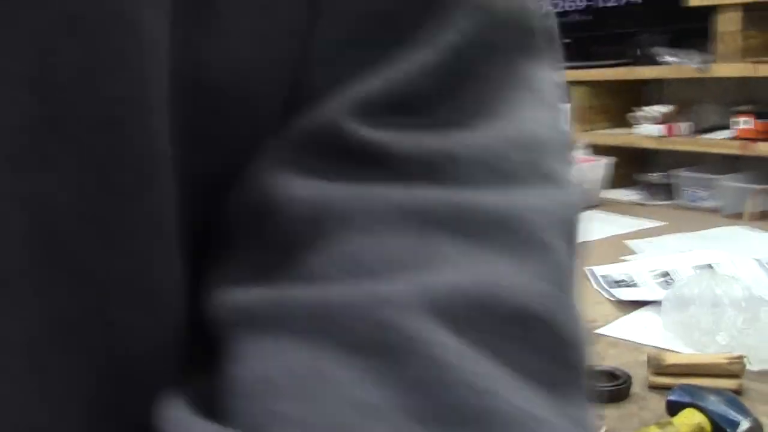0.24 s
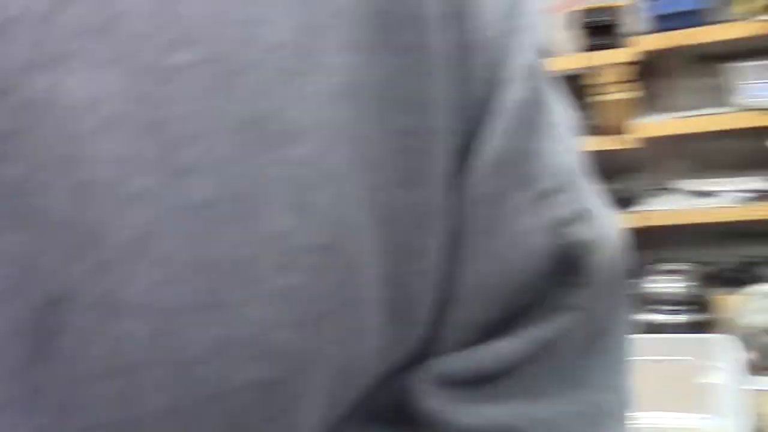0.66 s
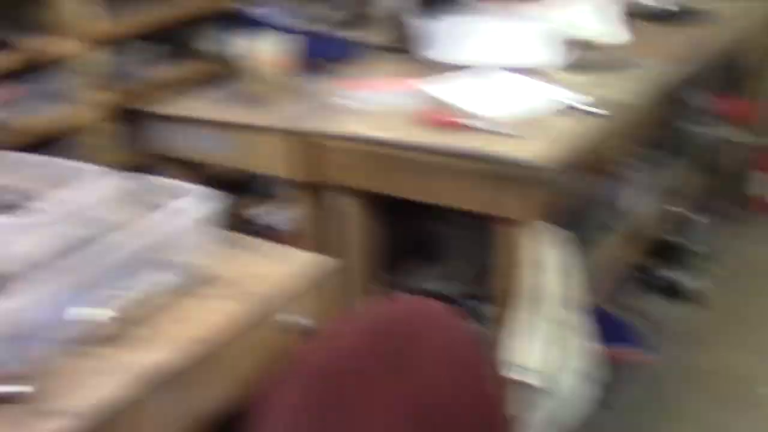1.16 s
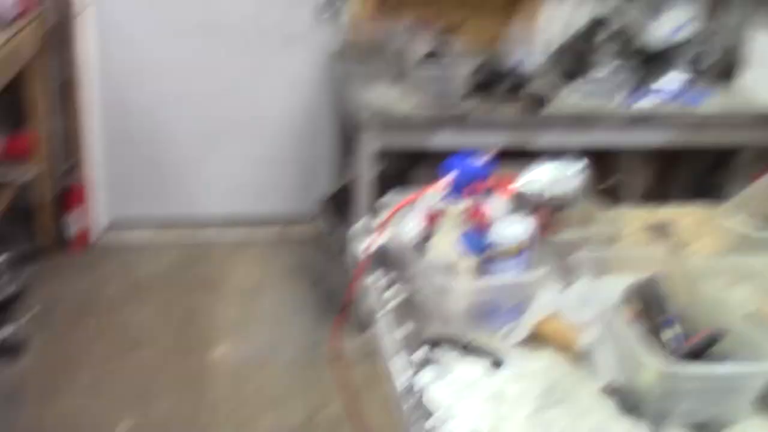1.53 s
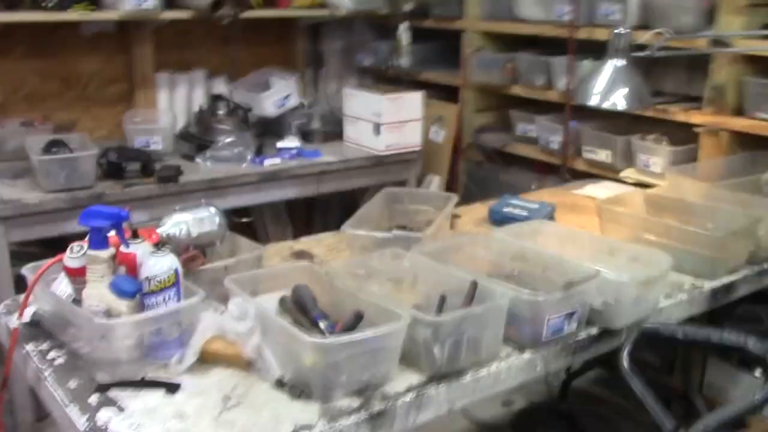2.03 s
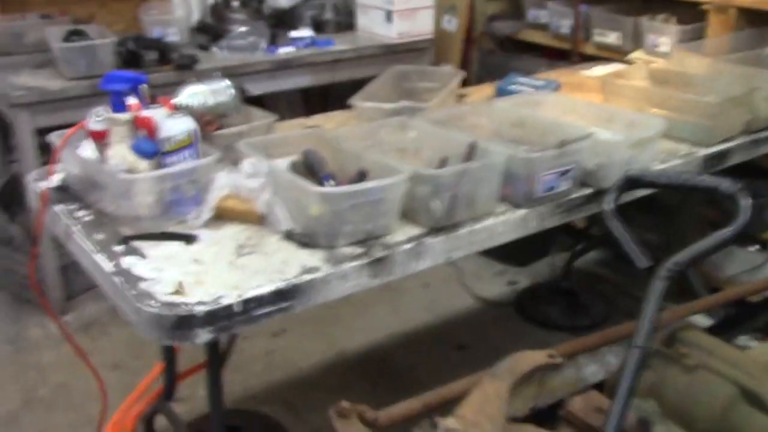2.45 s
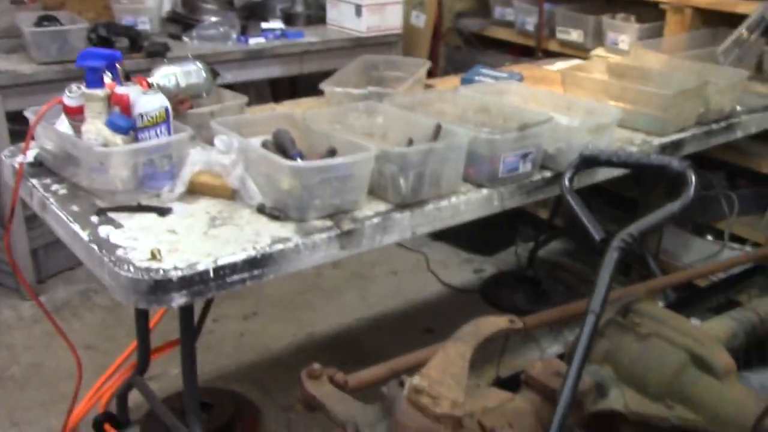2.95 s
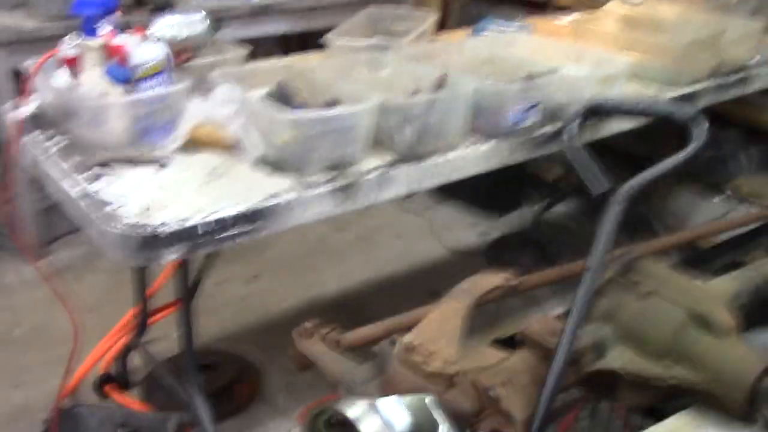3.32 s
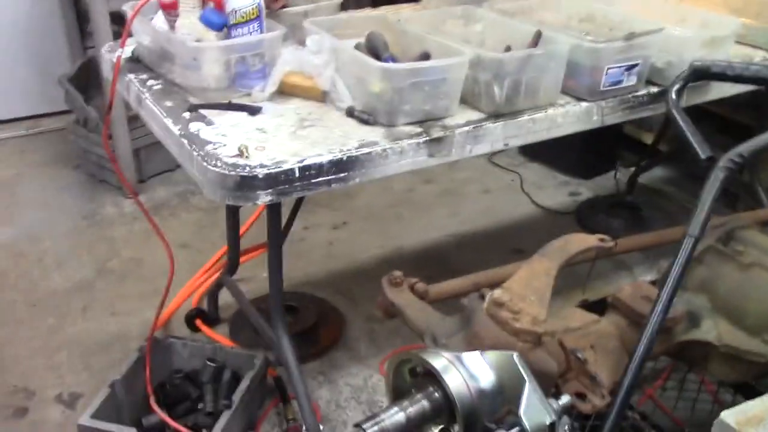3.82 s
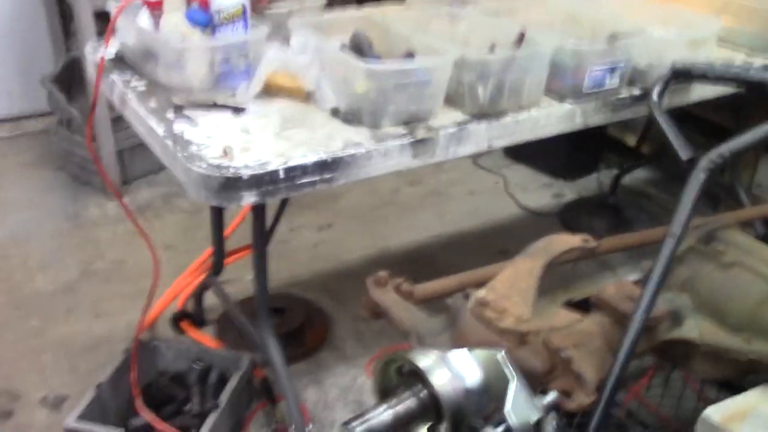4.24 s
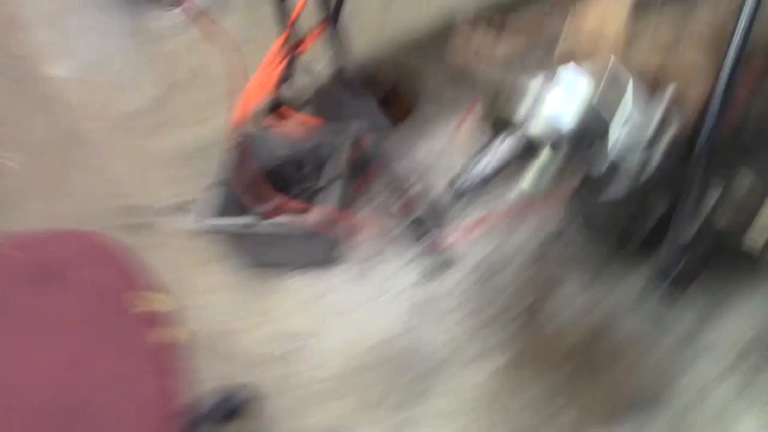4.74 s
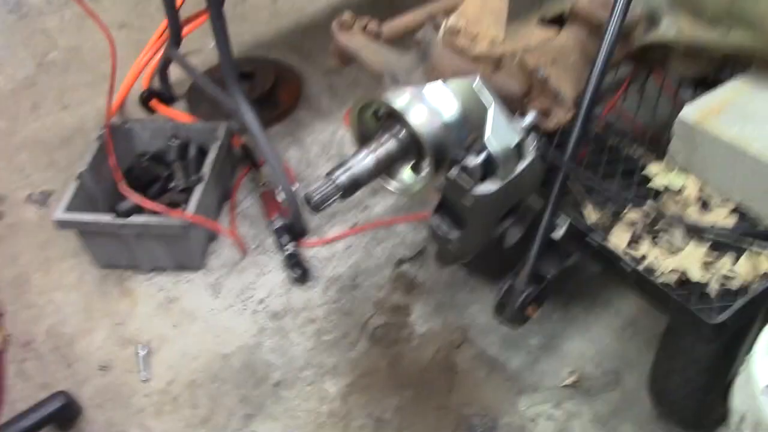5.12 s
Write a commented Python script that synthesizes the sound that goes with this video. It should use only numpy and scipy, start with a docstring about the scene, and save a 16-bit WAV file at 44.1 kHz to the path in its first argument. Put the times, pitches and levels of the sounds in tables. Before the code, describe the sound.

Close handling bumps come in rattling clusters from a carried tripod, over shoe scuffs, rubbing cloth and a low rumble.

```python
"""Clusters of knocks, soft at first and louder later, over a low rumble and scuffing: a camera on its
tripod is carried across a workshop and set down. The frame rumbles in the hand over quiet room tone.
Shoes on concrete and a sleeve on the grip make gritty noise. The legs knock and rattle; each blow travels
up the frame to the microphones, ringing legs, head and camera shell. The room adds a short tail."""
import sys
import numpy as np
from scipy import signal
from scipy.fft import rfft, irfft, next_fast_len
from scipy.io import wavfile
from scipy.ndimage import uniform_filter1d, map_coordinates

SR = 44100
rng = np.random.default_rng(int(sys.argv[2]) if len(sys.argv) > 2 else 0)


def output_pcm(signal):
    """Save a mono or channel-first signal as 16-bit PCM at the path in sys.argv[1].

    Samples are clipped to [-1, 1] before scaling.
    """
    pcm = np.clip(np.atleast_2d(signal).T, -1, 1) * 32767
    wavfile.write(sys.argv[1], SR, np.round(pcm).astype(np.int16))


N = 237026

# Sway of the carried frame. Each row: time in seconds, rumble level in dB.
SWAY_LEVELS = [(0.0, -54.5), (0.39, -55.5), (0.63, -54.5), (0.88, -53), (1.06, -53), (1.17, -52.5),
               (1.93, -53.5), (2.04, -50), (2.47, -56.5), (2.63, -53), (2.77, -51), (3.19, -47),
               (3.25, -47), (3.38, -58.5), (3.59, -63), (3.86, -60), (4.1, -57.5), (4.65, -53.5),
               (4.81, -49.5), (4.93, -44), (4.98, -50), (5.27, -47), (5.37, -50)]
# Noise and click spectra. Each row: frequency in Hz, relative spectral density in dB.
RUMBLE_SPECTRUM = [(15, -77), (25, -51), (81, -11.5), (240, -2), (387, -8), (419, -9), (505, -15.5),
                   (600, -30), (780, -57), (1320, -120)]
AIR_SPECTRUM = [(240, -33), (400, 8.5), (669, -9), (734, -6), (1210, -3), (2320, -17.5), (4070, -17),
                (5730, -18), (12900, -28), (16500, -67)]
DRAG_SPECTRUM = [(250, -22), (420, 0), (700, 5.5), (1100, 2.5), (1600, -32)]
SCRAPE_SPECTRUM = [(800, -39), (1250, 0), (2100, -1.5), (3100, -3.5), (3900, -8), (5500, -23)]
HISS_SPECTRUM = [(2060, -41), (3500, -19), (5130, 2), (5840, 3.5), (7980, -2.5), (11600, -11), (15900, -44),
                 (16200, -26.5), (16500, -66.5)]
CLICK_SPECTRUM = [(2350, -35), (4000, 1), (4450, 4.5), (5880, -8.5), (6430, -4), (10900, -16.5),
                  (15200, -37), (16000, -26), (16500, -39)]
# Soles and cloth, one list per stretch. Each row: time in seconds, drag, scrape and hiss levels in dB.
RUB_LEVELS = [
    [(0.0, -64, -70, -74), (0.11, -57.5, -61, -62), (0.156, -57, -53, -71), (0.232, -50, -59, -68),
     (0.278, -45.5, -45.5, -55.5), (0.422, -58, -64, -68), (0.6, -63, -65, -70)],
    [(0.6, -59, -58, -56.5), (0.7, -57, -48.5, -50), (0.858, -60, -55.5, -58), (1.0, -47, -45.5, -55),
     (1.2, -61.5, -57, -63)],
    [(1.2, -61.5, -61.5, -66), (1.344, -52, -49, -68), (1.478, -37.5, -40, -51.5),
     (1.528, -45, -33.5, -44.5), (1.568, -36, -30, -43), (1.676, -50.5, -46, -56), (1.726, -63, -66.5, -74),
     (1.946, -56, -59.5, -67.5), (2.03, -49, -61, -73)],
    [(2.03, -58, -59, -65), (2.11, -43, -45.5, -56), (2.3, -58.5, -54.5, -59.5), (2.47, -60, -74, -83),
     (2.522, -54, -46, -49.5), (2.604, -44, -37, -50), (2.64, -59, -52, -66), (2.68, -58, -49, -50)],
    [(2.68, -59, -63, -72), (2.75, -44.5, -35, -42), (2.804, -41.5, -36, -43), (2.916, -54, -55.5, -63),
     (3.07, -37, -51, -60)],
    [(3.07, -51, -49, -58), (3.202, -46, -56, -55), (3.262, -41, -54, -63), (3.302, -45, -45, -74),
     (3.402, -54.5, -59, -67), (3.454, -74, -80.5, -81), (3.65, -56, -60, -67)],
    [(3.65, -65, -73, -83), (3.71, -65, -70, -77), (3.818, -56, -53.5, -66), (3.882, -58, -51, -66),
     (3.952, -52.5, -51.5, -60.5), (4.04, -51.5, -50, -56.5), (4.092, -55.5, -55.5, -60),
     (4.25, -63.5, -67.5, -77)],
    [(4.25, -64, -76.5, -85.5), (4.338, -51, -53, -65), (4.456, -55, -60.5, -62.5),
     (4.658, -58.5, -71.5, -72.5), (4.72, -49, -57, -68)],
    [(4.72, -54, -56, -69), (4.768, -42, -41, -50), (4.872, -52, -53, -54), (4.94, -41, -44, -54),
     (4.998, -54, -59, -58), (5.108, -56, -54, -63), (5.188, -57, -47, -59), (5.252, -55, -63, -59.5),
     (5.375, -56, -67, -70)],
]
# Stereo image of the rubbing. Each row: frequency in Hz, left-right correlation.
RUB_CORRELATION = [(60, 1), (180, 0.94), (550, 0.96), (1650, 0.99), (4970, 0.91), (15000, 0.98)]
# Blows on the frame. Each row: start in seconds, base levels of shell, legs, head and click in dB,
# ring pitch in Hz, base rattle T60 in seconds.
FRAME_KNOCKS = [(0.1077, -47, -54, -45, -59, 1620, 0.06), (0.154, -36, -39.5, -37.5, -62, 970, 0.052),
                (0.1924, -31.5, -41, -42, -51, 2210, 0.057), (0.231, -35, -53, -51, -55, 1370, 0.043),
                (0.2573, -32, -44, -43, -55, 1145, 0.068), (0.2939, -37, -48, -46, -59, 960, 0.06),
                (0.3403, -27.5, -52, -33.5, -47, 1890, 0.063), (0.378, -36, -53, -52, -62, 1060, 0.074),
                (0.4299, -49, -62, -44.5, -67, 961, 0.044), (0.4903, -52, -56, -59, -74, 1160, 0.073),
                (0.8594, -43, -55, -39, -51, 1240, 0.068), (0.9702, -30, -44, -38, -44, 2520, 0.067),
                (0.9837, -28, -40.5, -39, -39, 895, 0.06), (0.9957, -25.5, -50, -29, -44, 1010, 0.054),
                (1.0253, -19, -40, -35.5, -31.5, 2190, 0.041), (1.075, -25.5, -56, -33, -52, 2090, 0.047),
                (1.1295, -36, -51, -37, -63, 940, 0.034), (1.252, -46, -63, -45.5, -54, 1090, 0.06),
                (1.3042, -34, -69, -52, -61, 1210, 0.06), (1.7004, -38, -53, -43, -62, 902, 0.063),
                (2.0416, -22, -30, -30.5, -37, 1150, 0.058), (2.0534, -9.5, -35.5, -34, -23.5, 2410, 0.038),
                (2.0643, -27, -37, -30.5, -47, 1150, 0.056), (2.0884, -40, -34, -29, -61, 902, 0.046),
                (2.1782, -25.5, -39.5, -29, -47, 1290, 0.067), (2.4164, -2, -27.5, -23, -19.5, 1777, 0.058),
                (2.4279, -9, -29, -19, -20, 1050, 0.068), (2.4767, -24, -40, -31.5, -37, 2490, 0.06),
                (2.4863, -11.5, -34, -28.5, -44, 1420, 0.048), (2.5204, -34, -47, -47, -53, 1890, 0.06),
                (2.5419, -31, -49, -37.5, -49, 1740, 0.087), (2.6273, -34.5, -45.5, -37, -63, 2430, 0.06),
                (3.0777, -4, -24.5, -11, -23.5, 2565, 0.057),
                (3.0888, -13.5, -37.5, -38, -28.5, 3020, 0.074), (3.1101, -12, -34, -28, -26.5, 2040, 0.06),
                (3.1341, -22, -43, -26, -38, 2010, 0.078), (3.1633, -25.5, -51, -37, -47, 1110, 0.053),
                (3.2191, -19, -34, -24.5, -35, 2120, 0.054),
                (3.2304, -15.5, -38, -24.5, -29.5, 2140, 0.065),
                (3.2542, -23.5, -44, -50, -37, 2300, 0.049), (3.2954, -23, -51, -35, -45, 1990, 0.049),
                (3.315, -26, -41, -40, -46, 2150, 0.06), (3.3583, -31, -42, -34.5, -61, 1180, 0.083),
                (3.3769, -25.5, -41.5, -34, -52, 1945, 0.06), (3.4186, -31, -65, -41.5, -59, 1430, 0.07),
                (3.469, -46.5, -61, -57, -64.5, 1150, 0.071), (3.5376, -58, -56.5, -63.5, -75, 2290, 0.06),
                (3.618, -48, -55.5, -57.5, -68.5, 2020, 0.06), (3.637, -42, -44, -49, -62.5, 1160, 0.06),
                (3.6702, -28.5, -48, -31, -59, 970, 0.042), (3.6775, -26, -33.5, -33.5, -51, 910, 0.073),
                (3.7073, -35, -52, -42, -59, 2130, 0.057), (3.7344, -40, -61, -53, -60, 1150, 0.06),
                (3.7608, -40, -60, -50, -63, 1300, 0.06), (3.8335, -35.5, -62, -52, -63, 2960, 0.06),
                (3.8842, -39, -59, -56, -58, 2700, 0.065), (3.9101, -33.5, -54, -51, -55, 2370, 0.06),
                (3.9953, -25.5, -54.5, -40.5, -53.5, 1280, 0.056),
                (4.2872, -41, -60, -52, -64, 1340, 0.089), (4.4149, -42, -58, -46, -50.5, 902, 0.051),
                (4.458, -42, -62, -47.5, -58, 960, 0.06), (4.4915, -48, -60, -57, -51, 1480, 0.046),
                (4.5459, -30.5, -48, -40.5, -50, 2480, 0.087), (4.6943, -39, -49.5, -46, -44.5, 945, 0.042),
                (4.7395, -24, -31.5, -25, -50, 2500, 0.071), (4.7591, -21, -31, -23.5, -43, 2420, 0.08),
                (4.7765, -13, -35.5, -26, -27, 3070, 0.06), (4.7894, -17, -31, -27, -41, 2140, 0.06),
                (4.8146, -25, -38, -29.5, -31.5, 1220, 0.065), (4.8569, -12, -38, -35, -30.5, 1480, 0.035),
                (4.8873, -38, -44, -48, -57, 1960, 0.06), (4.9043, -31, -45, -45, -59, 1130, 0.06),
                (4.9157, -29, -36, -42, -50, 1430, 0.056), (4.9507, -22, -35.5, -28.5, -28.5, 2810, 0.038),
                (4.9668, -20, -34, -34, -40, 2170, 0.055), (4.979, -22.5, -31, -44, -50, 2090, 0.044),
                (4.996, -41, -51, -53, -55, 3080, 0.054), (5.022, -35, -48, -48, -52, 1360, 0.051),
                (5.054, -44, -45, -39, -56, 1280, 0.056), (5.0811, -24, -32, -30, -45, 1700, 0.077),
                (5.1007, -11.5, -25.5, -16.5, -28, 2480, 0.06), (5.1069, -14, -34, -21, -27.5, 2410, 0.067),
                (5.186, -33, -54, -48, -56, 1200, 0.06), (5.223, -29.5, -41, -35.5, -52, 2810, 0.06),
                (5.2397, -21, -40, -39, -39.5, 2110, 0.064), (5.2465, -20, -32.5, -38.5, -48, 2510, 0.057),
                (5.3268, -37, -52, -44, -65, 980, 0.058)]
# Bending legs, hollow head, camera shell. Each row: frequency in Hz, width in Hz, relative gain in dB.
LEG_MODES = [(126, 62, -1.5), (228, 111, 0.5), (332, 116, -1)]
HEAD_MODES = [(567, 132, -1), (690, 87, 3), (850, 172, -3)]
SHELL_MODES = [(1240, 335, 0.5), (1870, 440, 0.5), (2097, 274, 4), (2504, 270, 1), (2915, 396, 0),
               (3655, 180, -6.5)]
# Room decay. Each row: frequency in Hz, T60 in seconds.
ROOM_T60 = [(150, 0.36), (1000, 0.28), (4000, 0.3), (12000, 0.27)]


def amp(db):
    """Gain of a level in dB."""
    return 10 ** (np.asarray(db) / 20)


def unit_rms(x):
    """x at rms 1."""
    return x / np.sqrt(np.mean(x ** 2) + 1e-20)


def at_hz(points, hz):
    """Interpolate (Hz, value) points on a log frequency axis."""
    knots_hz, values = np.transpose(points)
    return np.interp(np.log(hz + 1), np.log(knots_hz + 1), values)


def envelopes(rows):
    """One value per sample for each column after the time."""
    times_s, *columns = np.transpose(sorted(map(tuple, rows)))
    return [np.interp(np.arange(N) / SR, times_s, column) for column in columns]


def wobble(rate_hz):
    """Smooth random curve through rate_hz knots a second."""
    knots = rng.standard_normal(int(N * rate_hz / SR) + 4)
    return map_coordinates(knots, [np.arange(N) * rate_hz / SR])


def filtered(x, response):
    """x through a complex response, a function of Hz."""
    size = next_fast_len(N + SR // 2)
    return irfft(rfft(x, size) * response(np.fft.rfftfreq(size, 1 / SR)), size)[..., :N]


def resonator(modes):
    """Response of damped modes of alternating sign; unit power gain on white noise."""
    def shape(hz):
        return sum((-1) ** k * amp(db) * 1j * hz * width_hz / (mode_hz**2 - hz**2 + 1j * hz * width_hz)
                   for k, (mode_hz, width_hz, db) in enumerate(modes))
    norm = np.sqrt(np.mean(abs(shape(np.arange(1, SR / 2))) ** 2))
    return lambda hz: shape(hz) / norm


def minimum_phase(spectrum):
    """Causal response of a spectrum; unit power gain on white noise."""
    def response(hz):
        gain = np.maximum(amp(at_hz(spectrum, hz)), 1e-3)
        cepstrum = irfft(np.log(unit_rms(gain)))
        half = len(cepstrum) // 2
        cepstrum[1:half] *= 2
        cepstrum[half + 1:] = 0
        return np.exp(rfft(cepstrum))
    return response


def rough_noise(spectrum, correlation, patch_db, grit_db):
    """Stereo noise at rms 1 with fast flutter and random gain patches in time and frequency."""
    gritty = rng.standard_normal((2, N)) * amp(grit_db * wobble(350))
    bins = signal.stft(gritty, nperseg=512)[2]
    patches = uniform_filter1d(rng.standard_normal(bins.shape[1:]), size=6, axis=0)
    patches = uniform_filter1d(patches, size=5, axis=1)
    pair = signal.istft(bins * amp(patch_db * unit_rms(patches)), nperseg=512)[1][:, :N]

    def mid_side_gains(hz):
        angle = np.arccos(np.clip(at_hz(correlation, hz), -1, 1)) / 2
        return amp(at_hz(spectrum, hz)) * [np.cos(angle), np.sin(angle)]
    mid, side = filtered(pair, mid_side_gains)
    return unit_rms(np.array([mid + side, mid - side]))


def frame_rumble():
    """The frame sways and rumbles in the hand."""
    sway_db, = envelopes(SWAY_LEVELS)
    gain = amp(sway_db + 1.5 * wobble(12))
    return gain * rough_noise(RUMBLE_SPECTRUM, correlation=[(100, 0.97)], patch_db=2, grit_db=0)


def room_tone(level_db=-63):
    """Quiet air of the workshop."""
    return amp(level_db) * rough_noise(AIR_SPECTRUM, correlation=[(1000, 0.81)], patch_db=5.2, grit_db=1)


def rubbing():
    """Soles and cloth slide: dull drag, gritty scrape and fine hiss waver together."""
    drag_db, scrape_db, hiss_db = envelopes(np.vstack(RUB_LEVELS))
    stroke = wobble(29.97)
    drag = rough_noise(DRAG_SPECTRUM, RUB_CORRELATION, patch_db=3.5, grit_db=0.5)
    scrape = rough_noise(SCRAPE_SPECTRUM, RUB_CORRELATION, patch_db=2.5, grit_db=1)
    hiss = rough_noise(HISS_SPECTRUM, RUB_CORRELATION, patch_db=1, grit_db=1.5)
    return (amp(drag_db + 1.6 * stroke) * drag
            + amp(scrape_db + 1.8 * stroke) * scrape
            + amp(hiss_db + 0.8 * stroke) * hiss)


def knocks(attack_s=0.00034, blow_t60_s=0.006):
    """A sharp blow and a dying rattle drive legs, head and shell, with a click and a brief ring."""
    parts = (resonator(LEG_MODES), resonator(HEAD_MODES), resonator(SHELL_MODES),
             minimum_phase(CLICK_SPECTRUM))
    t60_ratios = np.array([[1.6], [1.2], [1.01], [0.8]])  # loose joints chatter longest in the heavy legs
    t = np.arange(SR // 4) / SR
    onset = 1 - np.exp(-t / attack_s)
    blow = 1.65 * amp(-60 * t / blow_t60_s)
    drives, ring = np.zeros((4, N + SR)), np.zeros(N + SR)
    for start_s, shell_db, legs_db, head_db, click_db, ring_hz, t60_s in FRAME_KNOCKS:
        start = round(start_s * SR)
        span = slice(start, start + len(t))
        rattle = amp(-60 * t / (t60_s * t60_ratios))
        gains = amp([[legs_db + 1.5], [head_db - 1.5], [shell_db - 8.5], [click_db + 1.5]])
        drives[:, span] += gains * onset * (rattle + blow) * rng.standard_normal((4, len(t)))
        ring_db = shell_db - 2 - 60 * t / (0.43 * t60_s)
        ring[span] += amp(ring_db) * onset * np.sin(2 * np.pi * ring_hz * t)
    return ring[:N] + sum(filtered(drive[:N], part) for drive, part in zip(drives, parts))


def shell_paths(frame, centre_hz=2300, width_hz=1500, side_db=-21):
    """The shell carries the upper mids to the two microphones slightly differently."""
    side = amp(side_db) * filtered(frame, resonator([(centre_hz, width_hz, 0)]))
    return np.array([frame - side, frame + side])


def room_tail(x, level_db=-11.5, delay_samples=200):
    """Each frequency dies at its own rate; both microphones get nearly the same tail."""
    hz, t, bins = signal.stft(rng.standard_normal((2, SR // 2)), SR, nperseg=256)
    decay = amp(-60 * t / at_hz(ROOM_T60, hz)[:, None])
    mid, side = signal.istft(bins * decay, SR, nperseg=256)[1]
    tail = np.array([mid + 0.32 * side, mid - 0.37 * side])
    tail /= np.linalg.norm(tail[0])
    delayed = np.pad(x, (delay_samples, 0))
    return amp(level_db) * signal.fftconvolve(delayed[None], tail, axes=1)[:, :N]


def scene():
    """Stereo mix; only the knocks excite the room."""
    frame = knocks()
    return shell_paths(frame) + room_tail(frame) + rubbing() + frame_rumble() + room_tone()


def record(dry, ceiling=1.05, cutoff_hz=16700):
    """Soft clip on the loudest blows, then a brick-wall low-pass."""
    clipped = dry / (1 + abs(dry / ceiling) ** 6) ** (1 / 6)
    return filtered(clipped, lambda hz: hz < cutoff_hz)


dry = scene()
out = record(dry)
output_pcm(out)
```